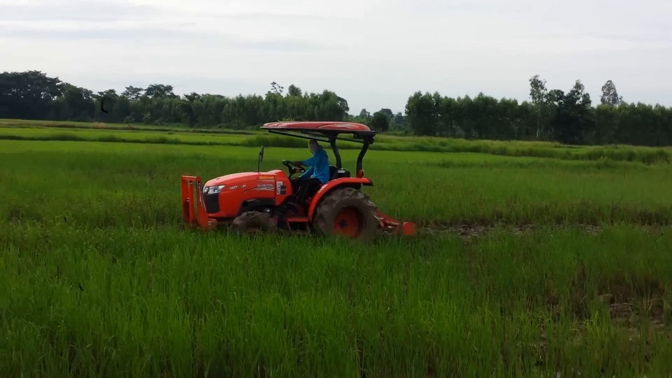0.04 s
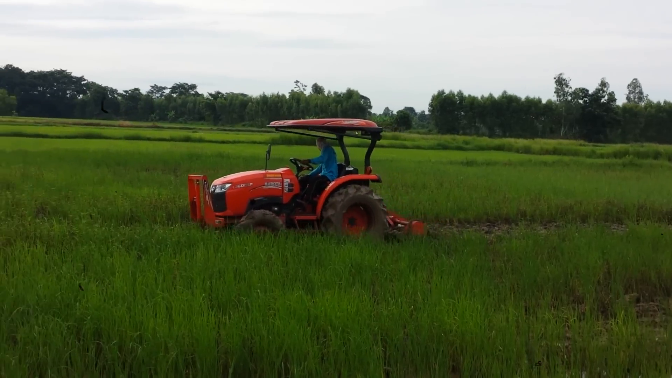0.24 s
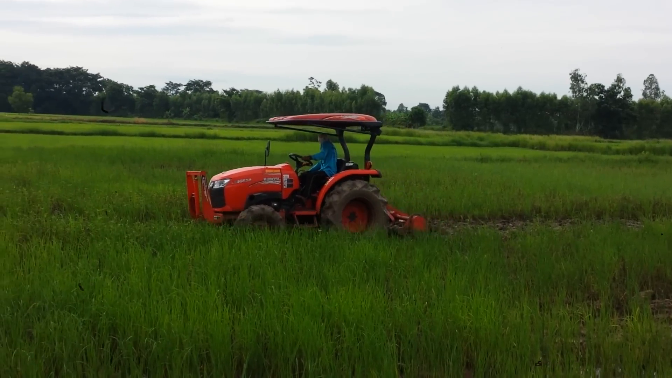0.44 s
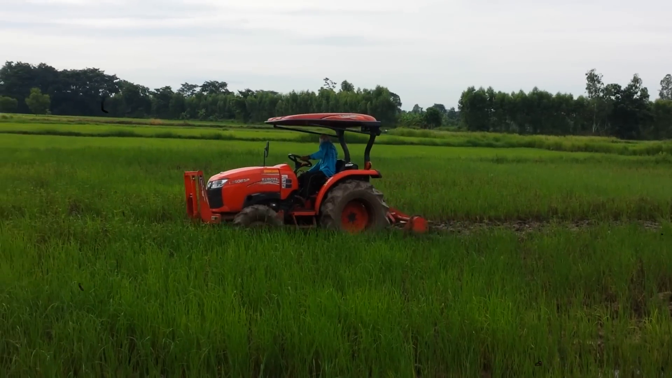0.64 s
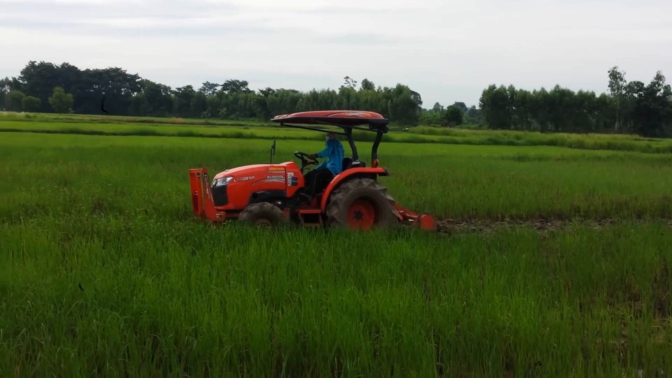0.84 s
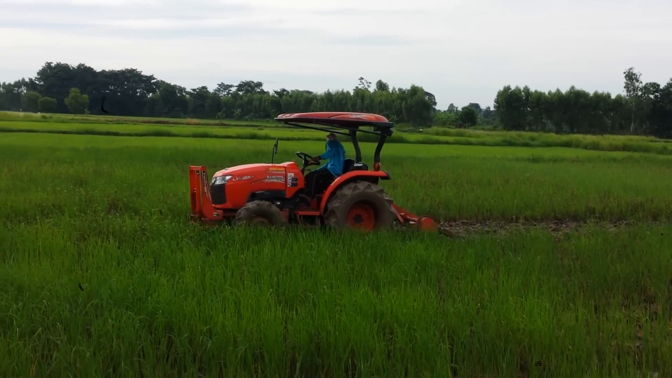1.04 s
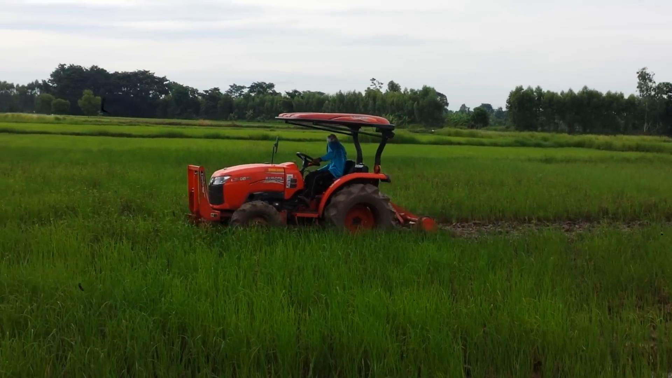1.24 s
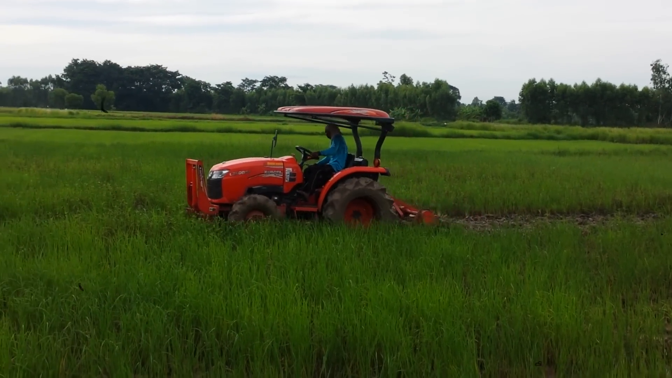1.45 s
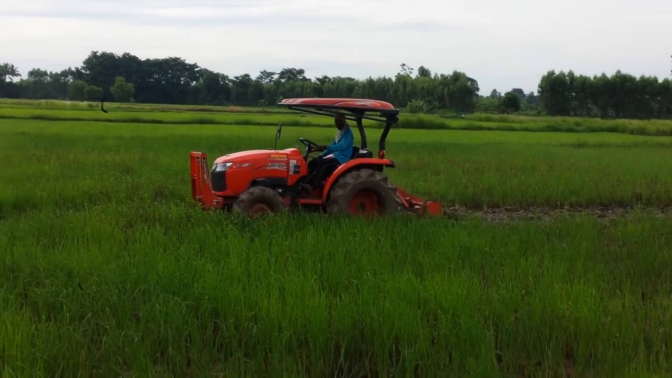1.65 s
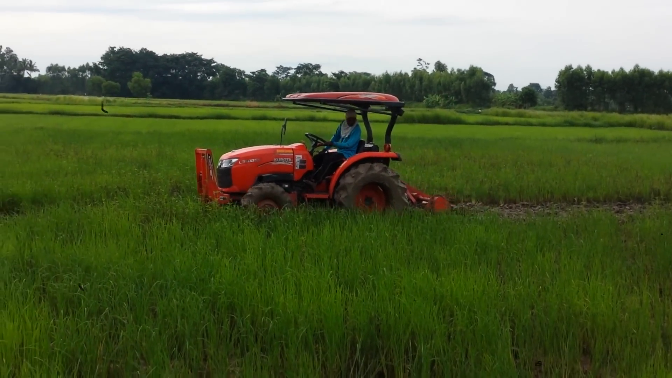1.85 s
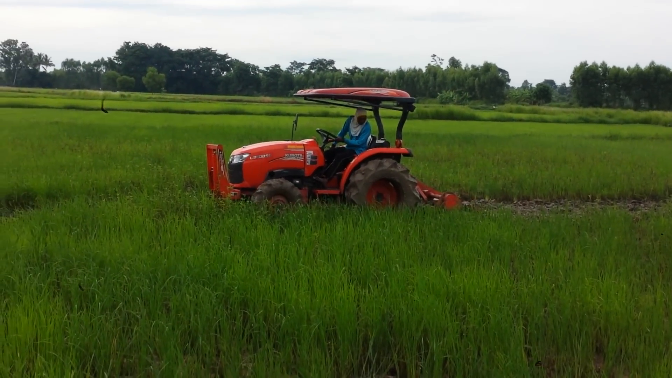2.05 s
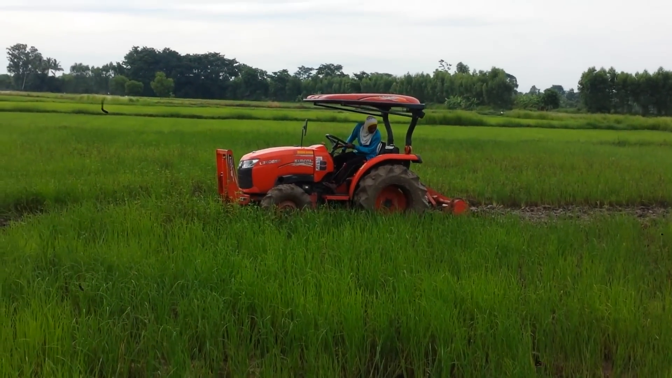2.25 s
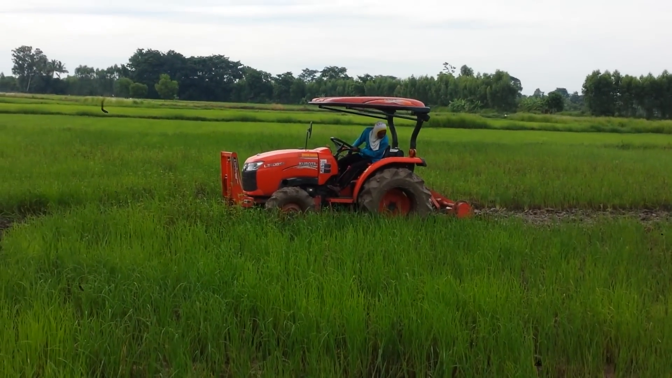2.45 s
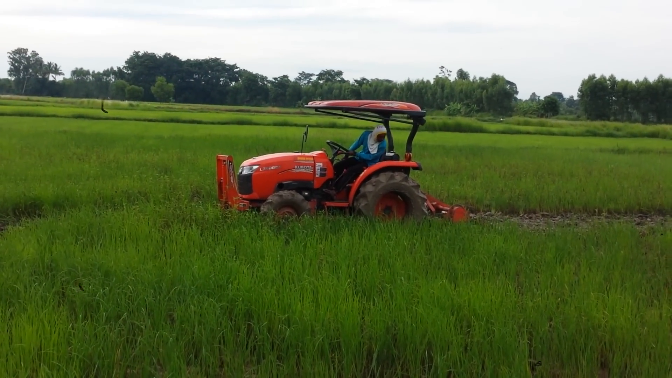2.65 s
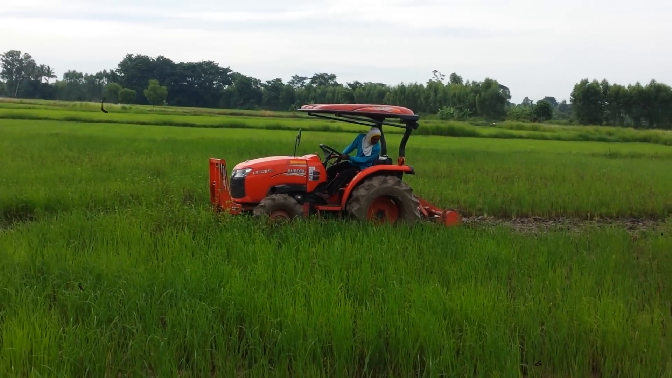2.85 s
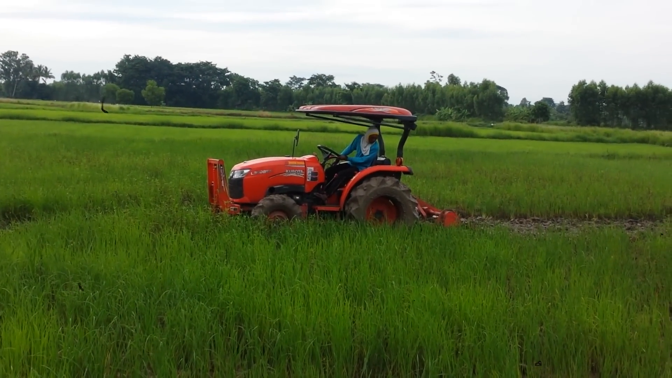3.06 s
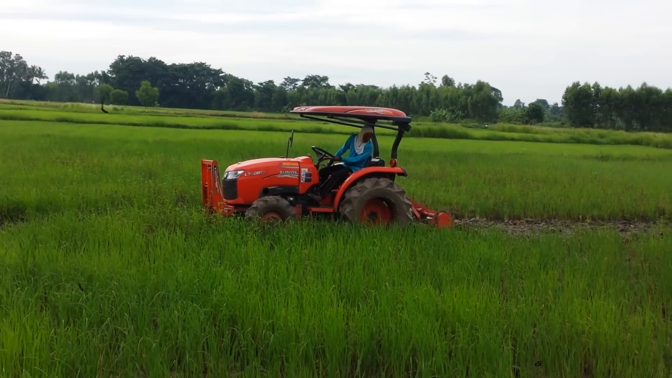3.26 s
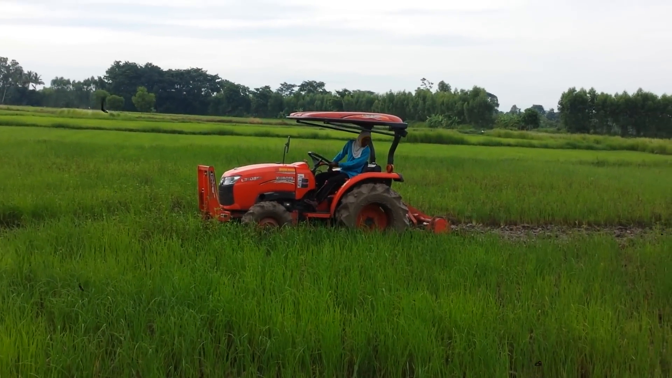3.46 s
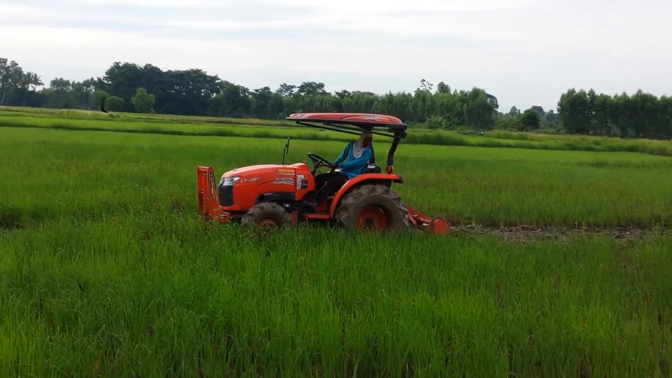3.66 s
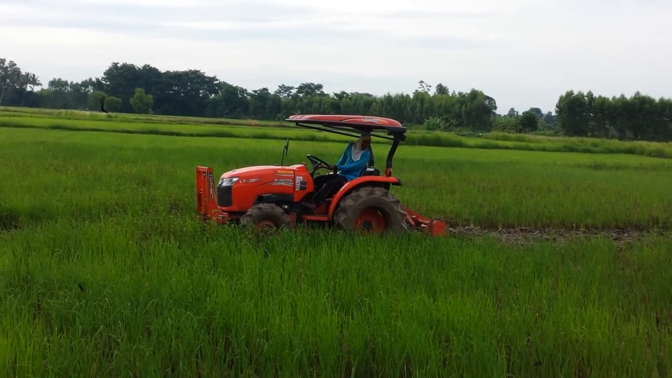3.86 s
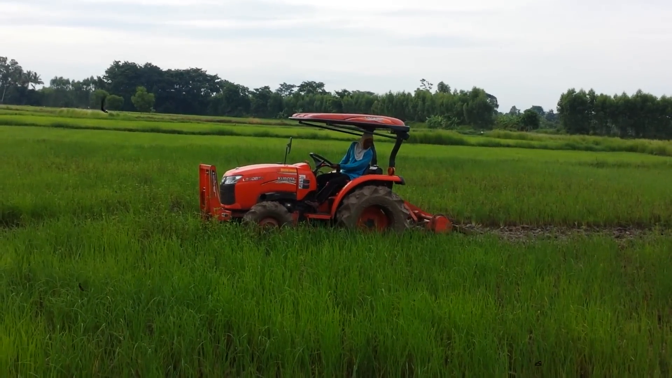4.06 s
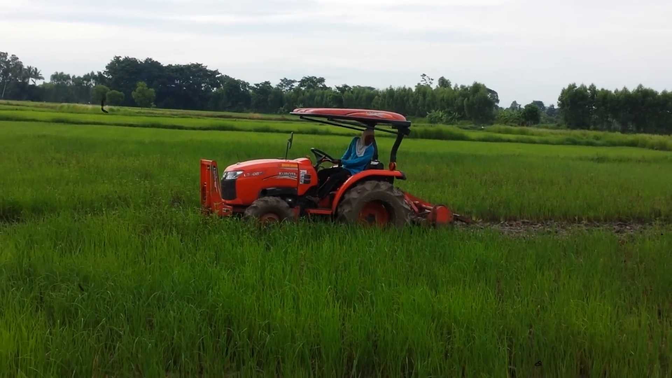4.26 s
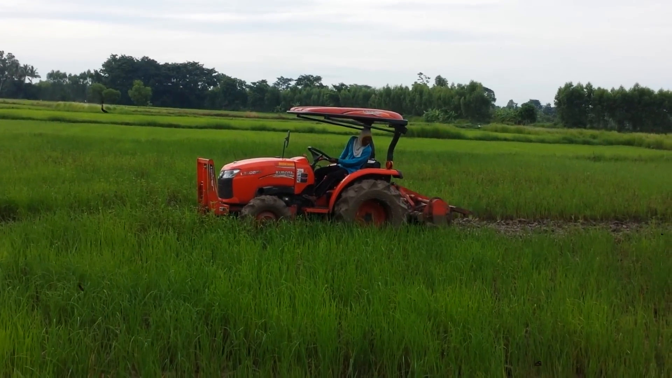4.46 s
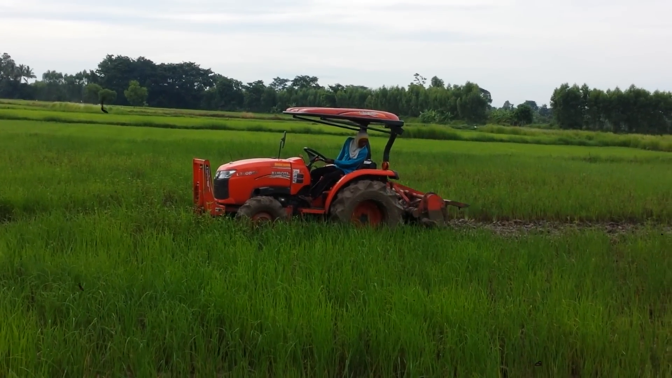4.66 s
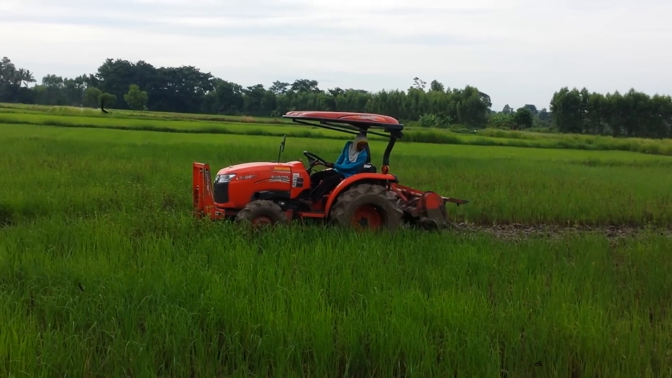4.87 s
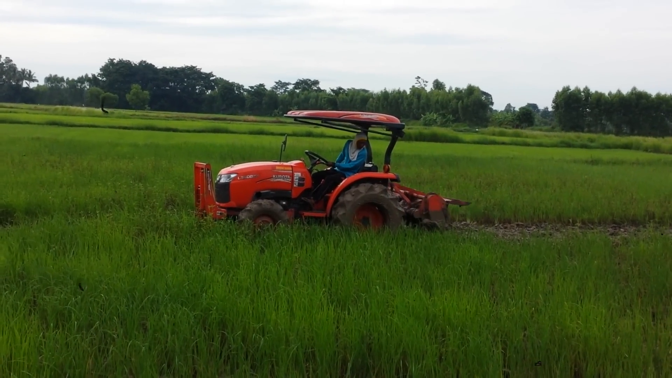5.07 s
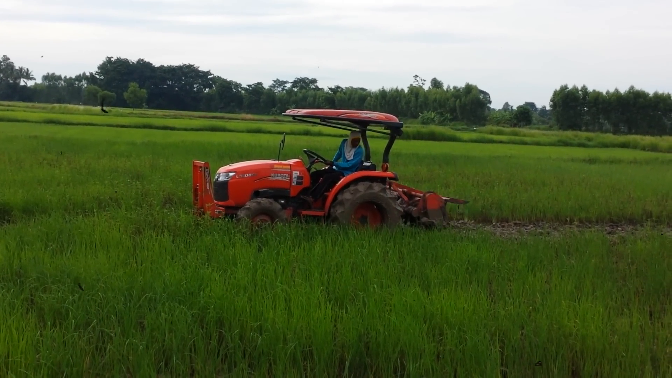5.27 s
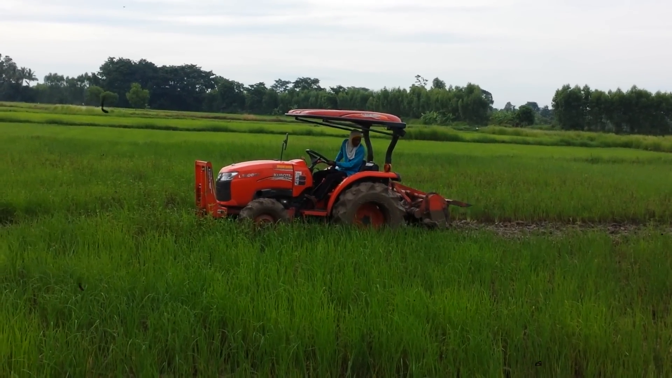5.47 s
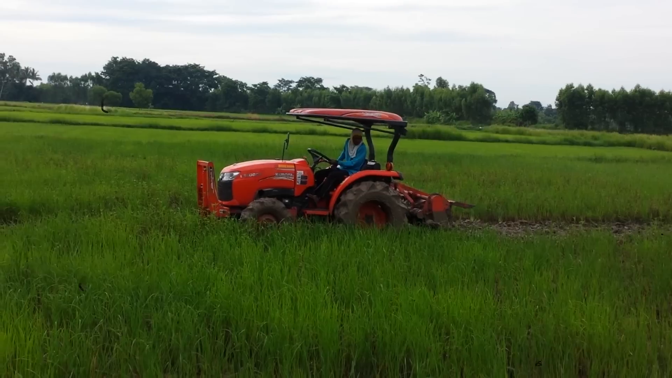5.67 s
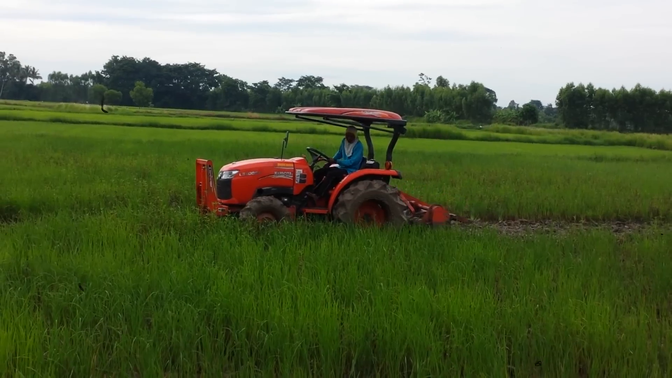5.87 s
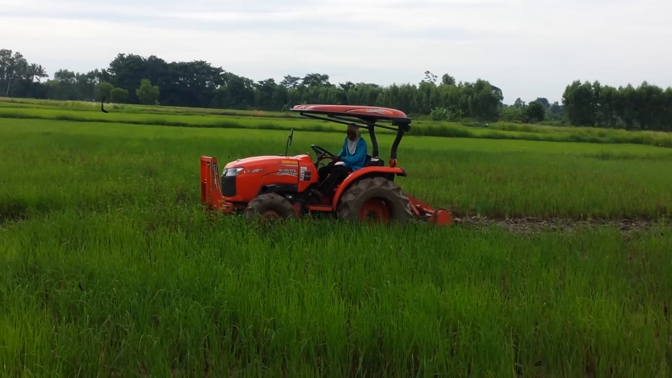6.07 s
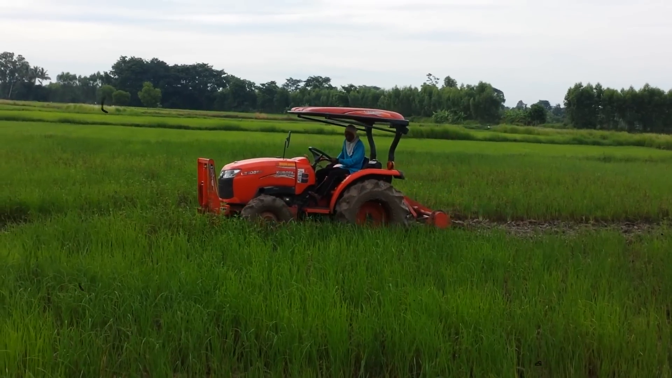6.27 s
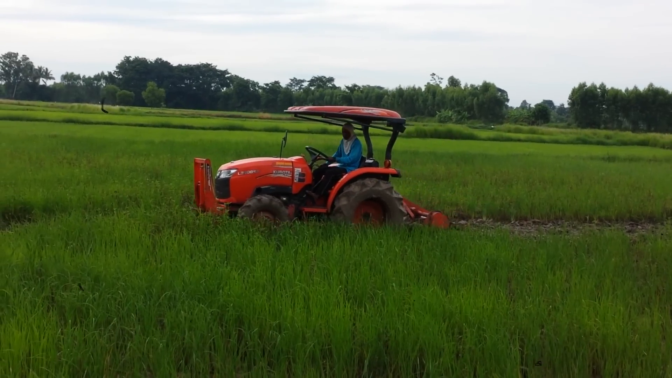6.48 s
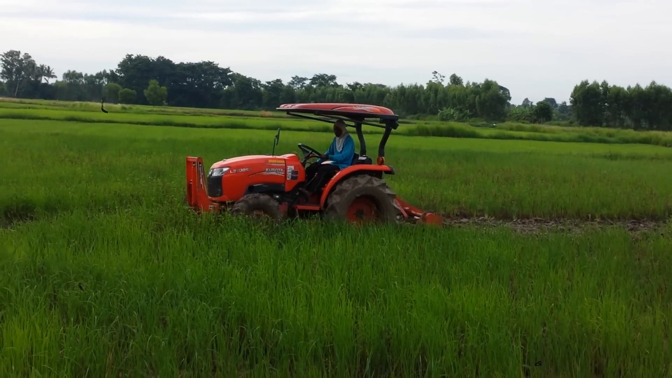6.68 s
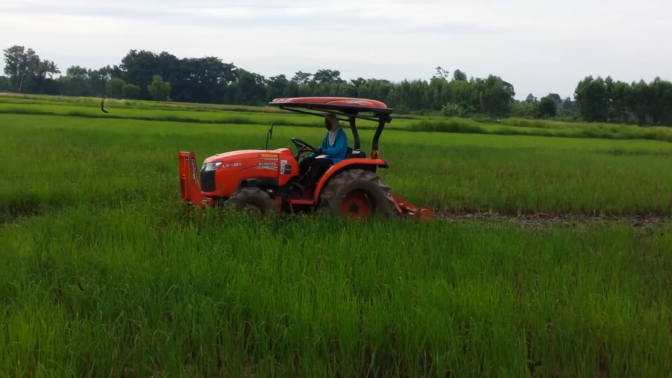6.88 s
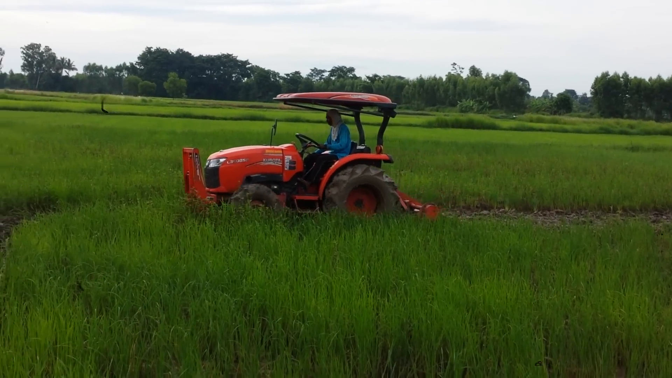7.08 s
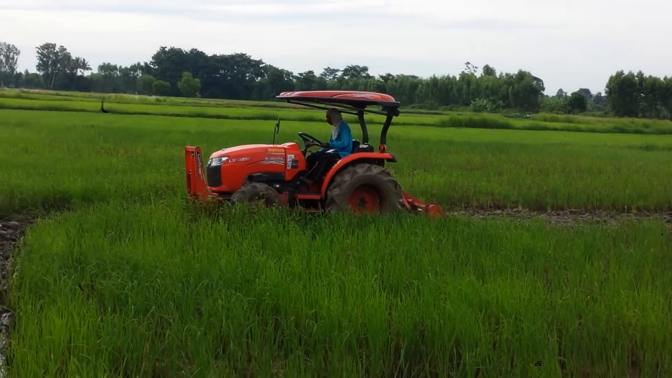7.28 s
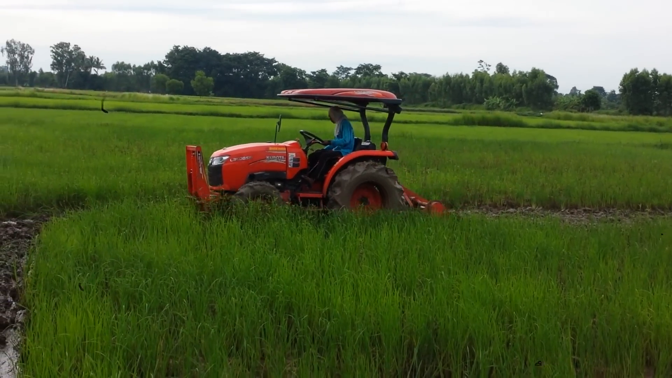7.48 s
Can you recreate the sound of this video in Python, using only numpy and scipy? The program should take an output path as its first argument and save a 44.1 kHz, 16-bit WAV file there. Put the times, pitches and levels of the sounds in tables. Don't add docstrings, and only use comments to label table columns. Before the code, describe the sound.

From 0 to 1.9 s a three-cylinder diesel pulls hard, around fifty dense thumps a second, with gritty block knock, broad hiss and low wheel and mud churn. At 1.9 s a wet slap marks lift-off: the burn cuts out, the sound thins and quietens, and pitch slides down with a faint gear whine to a slow chug near 3 s. Fuel returns at 3.1 s with a thud, idling lightly. At 3.65 s the frame knocks and clanks as load returns; speed jumps by 3.8 s and again by 4.5 s, with a deep thud at 4.1 s. A brief cut dips it at 4.8 s. It then chugs at medium speed, slowly sagging, with slaps and knocks around 5.2 s, a heavy thud at 5.55 s and small clanks. Around 6.3 s a loud slap, thuds and clanks accompany a turn; the engine's tone changes, and it labours on, lower and rough, until 7.5 s.

```python
import sys
import numpy as np
from scipy import signal
from scipy.fft import rfft, irfft, next_fast_len
from scipy.io import wavfile
from scipy.ndimage import uniform_filter1d

SR = 44100
rng = np.random.default_rng(int(sys.argv[2]) if len(sys.argv) > 2 else 0)


def natural_amplitude(level_db):
    exponent = np.asarray(level_db, float) / 20
    return 10 ** exponent


def dump(signal):
    limited = np.clip(np.atleast_2d(signal).T, -1, 1)
    pcm = np.round(limited * 32767).astype(np.int16)
    wavfile.write(sys.argv[1], SR, pcm)


N = 332073


def evened(x):
    return x / np.sqrt(np.mean(x ** 2) + 1e-20)


def read(points, hz):
    f, value = np.transpose(points)
    return np.interp(np.log(hz + 1), np.log(f + 1), value)


def played(rows):
    s, *columns = np.transpose(rows)
    times = np.arange(N) / SR
    return [np.interp(times, s, column) for column in columns]


def coloured(x, gain):
    size = next_fast_len(N)
    spectrum = rfft(x, size) * gain(np.fft.rfftfreq(size, 1 / SR))
    return irfft(spectrum, size)[..., :N]


def drift(seconds):
    width = round(seconds * SR)
    once = uniform_filter1d(rng.standard_normal(N), width)
    return evened(uniform_filter1d(once, width))


# t/s, rate/(firings a second)
SPEED = [(0, 52.7), (.4, 50.8), (1.624, 49.4), (1.967, 50.705), (2.473, 35.36), (3.05, 22.44), (3.1, 25.3),
         (3.561, 25.7), (3.812, 37.141), (4.296, 36.789), (4.487, 48.26), (4.714, 49.822), (4.946, 41.799),
         (5.299, 44.101), (6.097, 40.902), (6.267, 37.617), (6.585, 40.697), (7.53, 36.965)]
# t/s, charge/(share of a full one)
CHARGE = [(0, 1.0), (1.74, 0.97), (3.16, 0.49), (3.26, 0.43), (3.58, 0.44), (3.66, 0.76), (3.84, 0.63),
          (4.27, .64), (4.42, 0.89), (4.67, 0.7), (5.02, 0.66), (5.49, .61), (5.66, 0.69), (6.15, 0.72),
          (6.26, 0.8), (6.66, 0.87), (7.26, 0.83), (7.53, .88)]
# t/s, fuel (on 1, cut 0)
FUEL = [
    (0, 1),
    (1.87, 1),
    (1.905, 0),
    (3.045, 0),
    (3.08, 1),
    (4.735, 1),
    (4.765, 0),
    (4.895, 0),
    (4.925, 1),
]


def running():
    hz = uniform_filter1d(played(SPEED)[0], size=2000)
    turns = .15 + np.cumsum(hz) / SR
    fuel = played(FUEL)[0]
    charge = np.clip(played(CHARGE)[0], .01, 1.5) * fuel
    return hz, turns, fuel, charge


# f/Hz, level/dB per Hz
RUMBLE = [(8.8, -46), (15, -24), (63, -9), (86, -13.5), (141, 1), (194, 0), (230, 0), (300, -41),
          (510, -120)]


def rumble(load_db):
    low = evened(coloured(rng.standard_normal((2, N)), lambda f: natural_amplitude(read(RUMBLE, f))))
    return natural_amplitude(-44.5 + .8 * (load_db + 42) + 2.5 * drift(.1)) * low


# t/s, peak level/dB, f/Hz, t60/s
CLANKS = [(3.6561, -29, 3400, 0.11), (3.713, -27, 3380, 0.083), (4.322, -32, 4020, 0.084),
          (4.882, -32.5, 3860, 0.15), (4.925, -37, 3930, 0.12), (5.5294, -33.5, 3630, 0.11),
          (5.8564, -32, 3620, 0.1), (5.95, -29, 4020, 0.05), (6.0994, -36, 5000, 0.06),
          (4.4, -32, 4460, .05), (4.47, -43, 5300, .05), (5.21, -31, 4700, .05), (5.82, -33, 3800, 0.059),
          (6.268, -33, 5050, .06), (6.33, -34, 5100, 0.054), (6.352, -30, 5100, .05)]
# t/s, peak level/dB, f/Hz, t60/s
SLAPS = [
    (1.8946, -24, 4680, 0.11),
    (5.229, -28, 6120, 0.054),
    (5.249, -26, 5620, 0.057),
    (5.271, -24, 6020, 0.16),
    (6.2915, -19, 5930, 0.04),
]
# t/s, peak level/dB, f/Hz, t60/s
THUDS = [
    (3.063, -24, 1680, 0.043),
    (3.643, -18, 1055, 0.035),
    (3.643, -21, 2580, 0.043),
    (4.12, -17.5, 296, 0.098),
    (5.205, -19.5, 768, 0.077),
    (5.215, -22, 266, 0.11),
    (5.555, -16.5, 268, 0.051),
    (6.26, -19, 272, 0.05),
    (6.34, -16.5, 760, 0.041),
]


def knocks():
    ring_samples = 6000
    out, t = np.zeros((2, N + ring_samples)), np.arange(ring_samples) / SR
    # rows, width/Hz, level/dB
    for rows, width, db_off in ((CLANKS, 170, 3), (SLAPS, 900, 0), (THUDS, 220, -1)):
        for s, db, hz, t60 in rows:
            b, a = signal.butter(2, width / SR)
            wobble = signal.lfilter(b, a, rng.standard_normal((2, 2, ring_samples)))
            angle = 2 * np.pi * hz * t
            ring = evened(wobble[0] * np.cos(angle) + wobble[1] * np.sin(angle))
            envelope = natural_amplitude(db + db_off - 60 * t / t60) * (1 - np.exp(-t / 0.002))
            start = round(s * SR)
            out[:, start:start + ring_samples] += envelope * ring
    return out[:, :N]


GEARS = [34 / 3, 38 / 3]
GEARS_DB = [-52, -48.5]
# t/s, share
MESH = [(0, .3), (1.9, .4), (2.0, 1.1), (2.2, 1), (2.4, .3), (3.1, .1), (3.65, .1), (3.75, 1), (4.75, 1),
        (4.85, .2), (7.53, .2)]


def gears(turns):
    whine = np.zeros(N)
    for multiple, db in zip(GEARS, GEARS_DB):
        level = natural_amplitude(db + drift(0.13))
        whine += level * np.sin(2 * np.pi * multiple * turns + .5 * drift(.05))
    return np.sqrt(2) * played(MESH)[0] * whine


CYLINDERS_DB = [-1, -0.27, -0.5]


def per_firing(turns, spread_db, pattern):
    count = int(turns[-1]) + 3
    db = pattern * np.resize(CYLINDERS_DB, count) + spread_db * rng.standard_normal(count)
    return natural_amplitude(uniform_filter1d(db[(turns + .3).astype(int)], size=120))


# turning parts level/dB at 40 firings a second,
# slope/dB per doubling of speed, full burn level/dB, slope/dB per doubling, power of the charge
NOISE_LAWS = [(-33.5, 16.5, -27.5, -2.5, 5.56), (-40, 8.5, -28, 0.5, 7.7), (-37, 11, -26, -2, 4.13),
              (-40, 6.5, -28, -5, 8.1), (-47.5, 2.5, -31.5, -10.5, 9.4), (-61.5, 6, -46, -11.1, 14)]
LINGER_S = [.009, .045]


def noise_levels(hz, charge):
    doublings, out = np.log2(hz / 40), []
    for k, (turn_db, turn_slope_db, burn_db, burn_slope_db, power) in enumerate(NOISE_LAWS):
        keep = np.exp(-1 / (LINGER_S[k > 2] * SR))
        burn = charge ** (power / 2)
        burn = signal.lfilter([1 - keep], [1, -keep], burn, zi=[keep * burn[0]])[0]
        turning = natural_amplitude(turn_db + turn_slope_db * doublings)
        burning = natural_amplitude(burn_db + burn_slope_db * doublings) * burn
        out.append(20 * np.log10(np.hypot(turning, burning)))
    return out


# f/Hz, width/Hz, level/dB, scatter of the blow t/s
PANELS = [(848, 117, -0.5, 0.00058), (1084, 144, 0, 0.00058), (1641, 99, 7.5, 0.00148),
          (1688, 16, 6.5, 0.00211), (2302, 27, 3, .008), (2520, 32, 8.5, 0.0036), (2750, 58, 7.5, .005),
          (3045, 33, 7, 0.0055)]


def panels(turns):
    at = np.flatnonzero(np.diff(np.floor(turns + .06)) > 0)
    cylinder_db = 1.3 * np.resize(CYLINDERS_DB, len(at))
    t, out = np.arange(3000) / SR, np.zeros(N)
    for hz, width, db, scatter in PANELS:
        blows = np.zeros(N + 2000)
        late = (scatter * SR * rng.random(len(at))).astype(int)
        spread_db = 5.5 if hz < 2000 else 8.5
        blows[at + late] = natural_amplitude(spread_db * rng.uniform(-1.1, 1, len(at)) + cylinder_db)
        envelope = np.exp(-np.pi * width * t) * (1 - np.exp(-t / 0.00051))
        ring = envelope * np.sin(2 * np.pi * hz * t)
        out += natural_amplitude(db) * evened(signal.oaconvolve(blows, ring)[:N])
    return out


# top f/Hz, share that pulses, lag after the thump t/s, burst length t/s,
# spread between firings/dB
PARTS = [(560, .15, -.002, .005, 1.5), (1280, .6, -.0004, .0035, 1.6), (3700, .4, .0015, .01, 2.4),
         (7300, .28, .004, .01, 2.5), (11000, .5, .003, .009, 3.), (15400, .25, .003, .008, 2.)]
# f/Hz, level/dB per Hz
BODY = [(110, -35), (180, 2), (204, -3.5), (312, -7), (575, -25), (705, -13), (865, -12), (1120, -12),
        (1280, -24), (1420, -16.5), (1660, -19), (1880, -21.5), (2220, -19.5), (2690, -19), (3800, -23),
        (4940, -49), (8360, -120)]
# f/Hz, level/dB per Hz
AIR = [(2120, -44), (3600, 1.5), (4270, -4), (5860, 1), (7330, -4.5), (8850, -7), (11800, -13.5),
       (12900, -23), (14200, -15.5), (15400, -25)]
PANELS_DB = [-2, -5]


def block(turns, hz, fuel, thump_db, levels_db):
    load = np.clip((thump_db + 31) / 14, .25, 1)
    knock = (.45 + .55 * fuel) * (45 / hz) ** .45
    rung = panels(turns)
    out, bottom = np.zeros((2, N)), 200.
    for k, db in enumerate(levels_db):
        top, share, lag, length, spread_db = PARTS[k]
        since = ((turns - lag * hz) % 1) / hz
        burst = (1 - np.exp(-since / 0.0015)) * np.exp(-since / length)
        burst = burst / np.sqrt(hz * length / 2)
        burst = burst * per_firing(turns - lag * hz - .3, spread_db, 1.6)
        drive = load if k < 2 else knock
        share = np.clip(share * drive, 0, .9)
        gate = np.sqrt(1 - share + share * burst ** 2) * natural_amplitude(0.73 * drift(0.026))
        colour = BODY if k < 3 else AIR
        inside = lambda f: 1 / (1 + (f / top) ** 24) / (1 + (bottom / (f + 1)) ** 24)
        noise = gate * rng.standard_normal((2, N))
        part = evened(coloured(noise, lambda f: natural_amplitude(read(colour, f)) * inside(f)))
        if k in (1, 2):
            ring_level = natural_amplitude(PANELS_DB[k - 1]) * drive
            struck = ring_level * evened(coloured(rung, inside))
            part = (part + struck) / np.sqrt(1 + ring_level ** 2)
        out += natural_amplitude(db) * part
        bottom = top
    return out


# t/s, share of the turn
SWING = [
    (0, 0.23),
    (6.1, 0.045),
    (6.35, 0.78),
    (7.53, 1),
]
# f/Hz, change of level/dB
SWUNG = [(300, 1.5), (420, -1.5), (600, 7.5), (800, 1.5), (1750, -4), (2200, 4.5), (2450, -3.5),
         (2900, 1.5)]


def swung(body):
    swing = np.clip(played(SWING)[0], 0, 1)
    other_side = coloured(body, lambda f: natural_amplitude(read(SWUNG, f) * (f < 3700)))
    return (1 - swing) * body + swing * other_side


# f/Hz, level/dB
PIPE = [(25, -37.4), (39, -24.5), (52, -8.5), (75, 2.5), (105, 1), (150, -0.37), (210, -4.3), (300, -18)]
BURN_DB = [-10.5, -15.5, -18.5, -17.5, -20]
BURN_POWER = [0.66, 1.62, 1.39, 2.05, 1.95]
SUCK_DB = [-14.5, -29, -36, -29.5, -35]


def orders(hz, charge):
    k = np.arange(1, 6)[:, None]
    burn = natural_amplitude(np.array(BURN_DB))[:, None] * charge ** np.array(BURN_POWER)[:, None]
    suck = natural_amplitude(np.array(SUCK_DB))[:, None] * (hz / 50) ** 0.83
    return natural_amplitude(read(PIPE, k * hz)) * (suck - burn)


def exhaust(turns, hz, heights):
    out = np.zeros(N)
    for k in range(1, 15):
        lead = 2.3 * np.arctan((52 / (k * hz)) ** 3)
        waver = k / 4
        phase = 2 * np.pi * k * turns + lead + .1 * waver * drift(.04)
        db = -4.0 * max(k - 5, 0)
        db = db - 14 * np.clip(k * hz / 290 - 1, 0, 1) * (k > 5)
        height = heights[min(k, 5) - 1] * natural_amplitude(db + .9 * waver * drift(.03))
        out += np.sqrt(2) * height * np.cos(phase)
    return out * per_firing(turns, .7, .8)


# f/Hz, left-right likeness
SAME = [(60, .995), (400, .98), (550, .86), (800, .98), (1150, .92), (1300, .55), (1600, .88), (2000, .2),
        (2700, .7), (3300, .3), (5200, .4), (8800, .4), (12000, .1)]
# f/Hz, level/dB
TILT = [(60, -1.4), (200, -1.8), (500, -2.2), (1000, -2), (1250, 3), (1700, 2), (2300, 11), (3000, 8),
        (3800, 2), (6200, 1), (8800, 5), (10000, -1), (11800, -12), (15000, -11)]
# f/Hz, phase/rad
LEAD = [(60, -.04), (300, -.15), (1000, -.15), (1300, .9), (1600, -.2), (2000, .8), (2700, -1.5),
        (3500, -2.9), (5200, -3.2), (8800, -2)]


def ports(shared, other):
    same = lambda f: np.clip(read(SAME, f), 0, 1)
    half_tilt = lambda f: natural_amplitude(read(TILT, f) / 2)
    left = coloured(shared, half_tilt)
    right = coloured(shared, lambda f: same(f) * np.exp(-1j * read(LEAD, f)) / half_tilt(f))
    right += coloured(other, lambda f: np.sqrt(1 - same(f) ** 2) / half_tilt(f))
    return np.array([left, right])


def scene():
    hz, turns, fuel, charge = running()
    heights, levels_db = orders(hz, charge), noise_levels(hz, charge)
    thump_db = 20 * np.log10(abs(heights[1]) + 1e-9)
    body = swung(block(turns, hz, fuel, thump_db, levels_db))
    noisy = rumble(levels_db[0]) + knocks() + natural_amplitude(-0.5) * body
    shared = noisy[0] + gears(turns) + exhaust(turns, hz, heights)
    return ports(shared, noisy[1])


def top_cut(x):
    return signal.sosfilt(signal.butter(12, 15910, fs=SR, output="sos"), x)


def record(dry):
    mix = 1.576 * np.tanh(dry / 1.326)
    return top_cut(mix)


dry = scene()
out = record(dry)
dump(out)
```